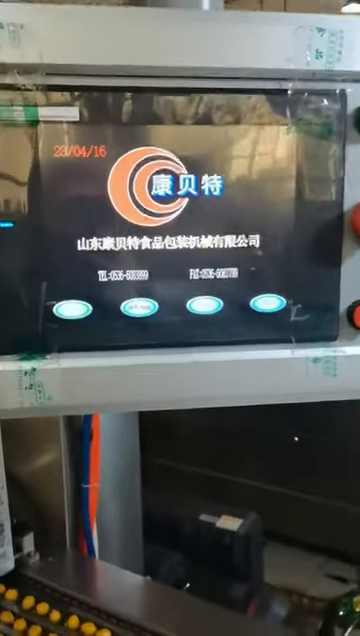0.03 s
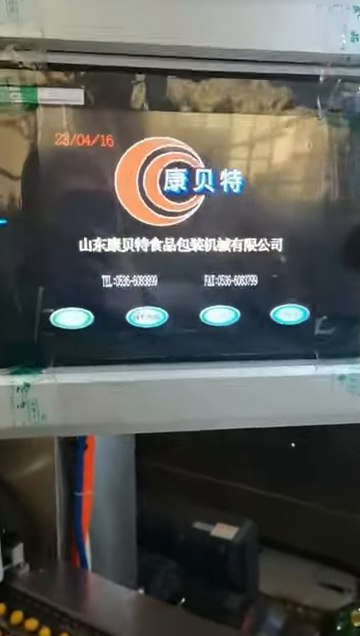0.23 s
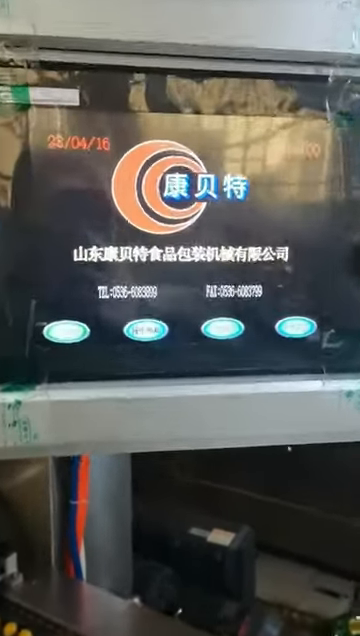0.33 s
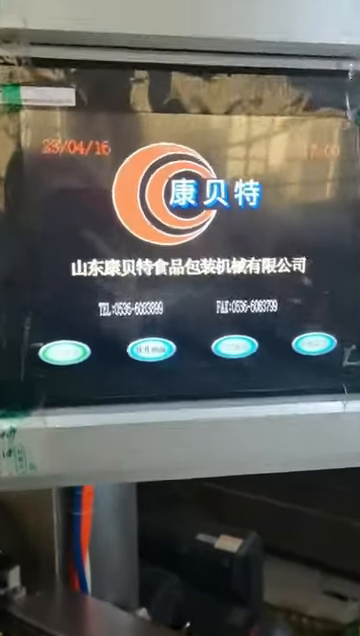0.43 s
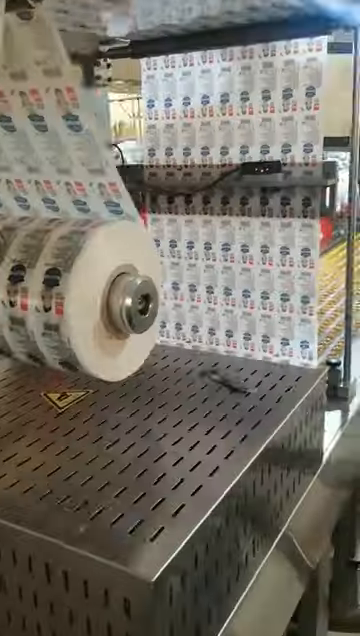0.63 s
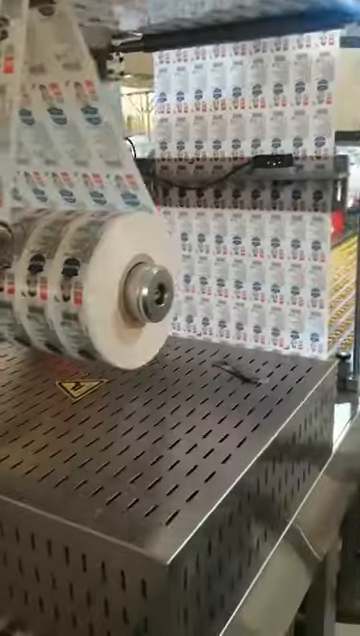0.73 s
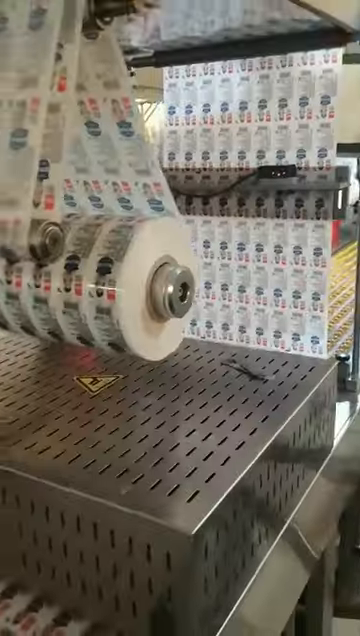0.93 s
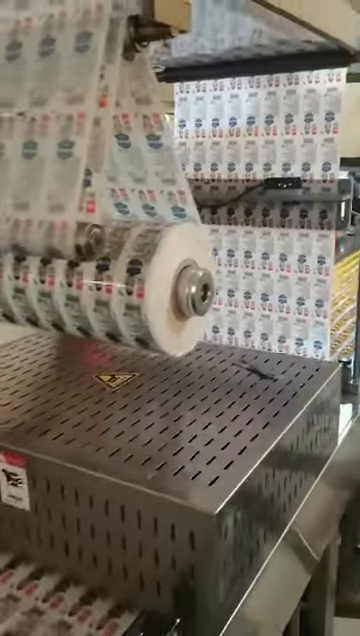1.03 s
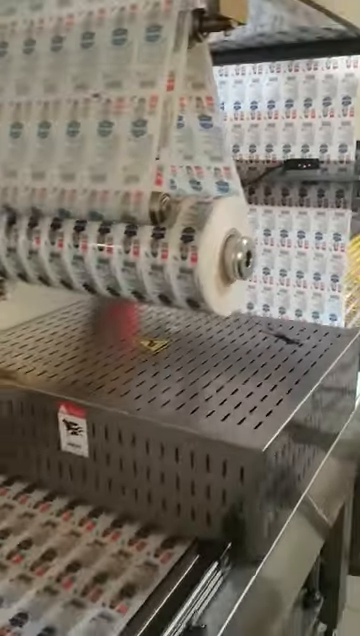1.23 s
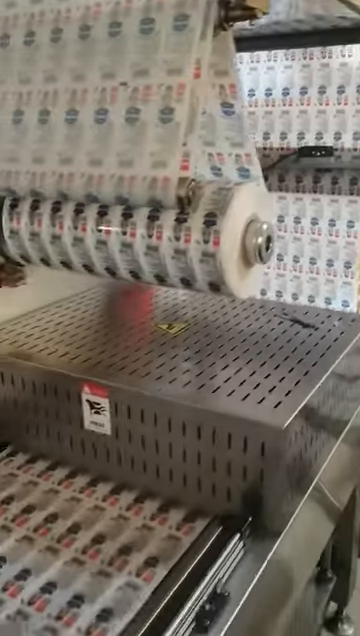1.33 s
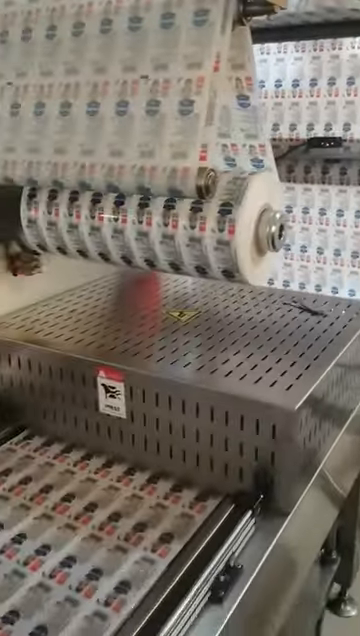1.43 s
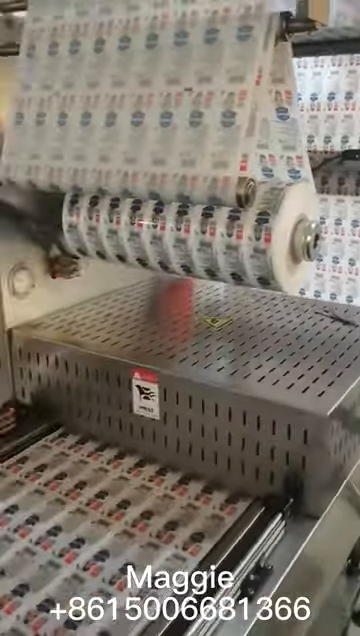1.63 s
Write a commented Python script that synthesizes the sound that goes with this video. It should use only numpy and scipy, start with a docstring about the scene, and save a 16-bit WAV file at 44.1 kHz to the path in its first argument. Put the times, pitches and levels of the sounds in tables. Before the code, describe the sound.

Air hisses in bursts from a nearby packaging machine over a low hum and whine. At 0.2 seconds a soft thump starts a sputtering blast, lasting until 0.5. Softer puffs and low knocks follow, with everything dipping briefly near 0.7. At 1.15 a smooth, bright hiss vents as the hum and whine drop. A small puff comes near 1.65. Each burst echoes in the factory hall.

```python
"""First comes the low hum and whine of a vacuum packaging machine, close by in a factory hall.
A faint hiss fades, then a valve thumps and lets out a sputtering blast. Softer air bleeds through
ringing pipes, and the whole sound dips once, briefly. A second valve vents a smooth, bright hiss
as the motor and pump drop away; a last small puff follows. Each burst of air bounces off steel
panels and rings on in the hall."""
import sys
import numpy as np
from scipy import signal
from scipy.fft import rfft, irfft
from scipy.io import wavfile

SR = 44100
rng = np.random.default_rng(int(sys.argv[2]) if len(sys.argv) > 2 else 0)


def to_wav(s):
    """Save 16-bit WAV."""
    ch = np.atleast_2d(s).T  # columns
    pcm = np.round(np.clip(ch, -1, 1) * 32767)  # PCM
    wavfile.write(sys.argv[1], SR, pcm.astype(np.int16))


N = 74970


def undb(db):
    """Turn decibels into a number to multiply by."""
    return 10 ** (np.asarray(db) / 20)

def clock():
    """The time of each sample in seconds."""
    return np.arange(N) / SR

def level_curve(points):
    """A volume that glides between (seconds, dB) points."""
    return undb(np.interp(clock(), *np.array(points).T))

def noise(gain):
    """Noise of average strength (rms) 1, with each frequency weighted by gain(Hz)."""
    freqs = np.arange(N // 2 + 1) * SR / N + 1e-6
    x = irfft(rfft(rng.standard_normal(N)) * gain(freqs), N)
    return x / x.std()

def coloured(points):
    """Noise shaped by (Hz, dB) points, fading out below the lowest one."""
    hz, db = np.array(points, float).T
    return noise(lambda f: undb(np.interp(np.log(f), np.log(hz), db)) * np.minimum(f / hz[0], 1) ** 2)

def resonant(hz, width):
    """Noise around one pitch: the narrower it is, the more it whistles."""
    return noise(lambda f: 1 / (1 + ((f - hz) / width) ** 2) ** 2)

def ringing(rings):
    """Air making metal ring at several pitches."""
    return sum(undb(db) * resonant(hz, width) for hz, width, db in rings)

def flutter(depth_db, rate_hz):
    """A smooth, random wobble in volume."""
    return undb(depth_db * noise(lambda f: np.exp(-(f / rate_hz) ** 2)))

def tone(hz, waver):
    """A machine tone, from steady (waver 0) to fully wavering (waver 1)."""
    steady = np.sqrt(2) * np.sin(2 * np.pi * (hz * clock() + rng.random()))
    return np.sqrt(1 - waver ** 2) * steady + waver * resonant(hz, width=22.7)

def swell(at, half_s):
    """A brief bell-shaped rise and fall."""
    return np.exp(-.5 * ((clock() - at) / half_s) ** 2)

def flow(start, rise, hold, db, sag, release):
    """A valve opens, holds and shuts. Sag and release are dB lost per second; a negative sag grows."""
    t = clock() - start - rise
    opening_db = 24.5 * np.minimum(t / rise, 0)
    return undb(db + opening_db - sag * np.clip(t, 0, hold) - release * np.maximum(t - hold, 0))


# The motor's tones. Each row: pitch in Hz, level in dB, waver from 0 to 1.
MOTOR_TONES = [(135.6, -51, 0.98), (160.8, -50, 0.65), (215.57, -46.5, 0.6), (297.7, -50, 0.84),
               (376.2, -58.5, 0.6)]
# How the hum swells and sinks. Each row: time in seconds, dB added to the tones.
MOTOR_SWELLS = [(0, -0.5), (.2, 6), (.32, -1.5), (.55, 3.5), (.85, -2), (1.15, -7), (1.21, -25),
                (1.35, -13), (1.58, -5), (1.7, -3.5)]

def motor():
    """A low hum that sinks when the second valve vents, then builds again."""
    hum = sum(undb(db) * tone(hz, waver) for hz, db, waver in MOTOR_TONES)
    return level_curve(MOTOR_SWELLS) * hum


# The colour of the pump's rumble. Each row: frequency in Hz, relative strength in dB.
PUMP_COLOUR = [(25, -11.5), (60, -3), (140, 0), (250, -4), (380, -3.5), (520, -11), (1000, -11.5),
               (2500, -14), (3200, -18.5), (7400, -13.5), (8700, -53), (14000, -28)]
# How loud the pump whines. Each row: time in seconds, level in dB.
WHINE_LEVELS = [(0, -45), (.15, -46.5), (.27, -51), (.55, -48.5), (.8, -47), (1.11, -42), (1.165, -50),
                (1.2, -62.5), (1.7, -62)]

def pump(whine_hz=441.8, idle_at_s=1.175, fall_s=0.014, idle_db=-14):
    """A whine over a slowly easing rumble; both fall to idle as the second valve vents."""
    t = clock()
    idling = np.clip((t - idle_at_s) / fall_s, 0, 1)
    level = undb(-39 - 2.5 * t + idle_db * idling)
    rumble = level * coloured(PUMP_COLOUR) * flutter(depth_db=1.8, rate_hz=29)
    whine = tone(whine_hz, waver=0.36) + undb(-16.5) * tone(2 * whine_hz, waver=0.91)
    return rumble + level_curve(WHINE_LEVELS) * whine


# The colour of the hall's background. Each row: frequency in Hz, relative strength in dB.
HALL_COLOUR = [(25, -2.5), (70, -0.5), (150, -3.5), (230, -4), (400, -5), (600, -7), (1500, -7.5),
               (2800, -7.5), (3300, -8), (4200, -4.5), (5200, -13.5), (7500, -9.5), (8700, -30),
               (10000, -18), (14000, -24.5)]

def hall_background():
    """The quiet, steady rush of the factory hall."""
    return undb(-48) * coloured(HALL_COLOUR)


# The colour of air in the pipes. Each row: frequency in Hz, relative strength in dB.
PIPE_COLOUR = [(500, -16), (1500, -22), (2500, -7.5), (3100, -9), (4300, -5), (5300, -5.5), (6400, 0.5),
               (7900, -1), (8550, -18), (9250, -11.5), (9800, -0.5), (11200, -3), (14000, -5)]
# The pipes' rings. Each row: pitch in Hz, width in Hz, dB compared with the air.
PIPE_RINGS = [(2760, 130, -23), (4186, 120, -18.5), (4907, 57, -17), (5713, 120, -21), (6240, 44, -15),
              (7630, 110, -12.5)]

def pipe_hiss():
    """Fluttering air that makes the pipes ring."""
    return (coloured(PIPE_COLOUR) + ringing(PIPE_RINGS)) * flutter(depth_db=0.9, rate_hz=48)

def fading_hiss(fade_db_per_s=84):
    """A faint hiss from the pipes, dying away from the very start."""
    return undb(-43.5 - fade_db_per_s * clock()) * pipe_hiss()


# Knocks of the mechanism. Each row: peak time and rise in seconds, pitch in Hz, level in dB.
FRAME_KNOCKS = [(.18, 0.0235, 217, -31), (.235, 0.0069, 196, -34), (0.254, 0.046, 58, -37),
                (0.407, 0.022, 158.5, -32.5), (0.606, 0.0088, 143, -36.5), (.79, 0.011, 132.2, -35.5),
                (.865, 0.013, 145, -35.5), (1.148, 0.0057, 212.7, -38.5), (1.669, 0.01, 128, -45.5)]

def knocks(decay_s=0.02):
    """Soft blows, each a short, low boom of the machine's frame."""
    out = 0
    for at, rise, hz, db in FRAME_KNOCKS:
        t = clock() - at
        shape = np.clip(1 + t / rise, 0, 1) * np.exp(-np.maximum(t, 0) / decay_s)
        boom = np.sqrt(2) * np.sin(2 * np.pi * hz * t) + undb(-7) * resonant(hz, width=160)
        out = out + undb(db) * shape * boom
    return out


# The first valve's blast. Each row: start, rise and hold in seconds, level in dB,
# sag and release in dB per second.
BLAST_FLOW = [(0.227, 0.033, 0.17, -22, 5, 130)]
# The colour of its jet. Each row: frequency in Hz, relative strength in dB.
BLAST_COLOUR = [(300, -27), (800, -12), (1350, -9.5), (1950, -1), (2750, 1.5), (3200, -5.5), (4100, -3.5),
                (5200, -5), (6300, 2.5), (7400, 1), (8400, -6.5), (10000, -1), (11800, -7.5), (14000, -6.5)]
# Its whistling port. One row: pitch in Hz, width in Hz, dB compared with the jet.
PORT_WHISTLE = (7080, 690, -6)
# Strong spurts in the blast. Each row: time in seconds, level in dB.
BLAST_SPURTS = [(.238, -35), (0.266, -26), (.285, -21), (.325, -24), (.339, -25), (.363, -28), (.404, -25)]
# The rasp as the valve closes. One row, laid out like BLAST_FLOW.
CLOSING_FLOW = (.415, .04, .034, -27.5, 0, 420)

def blast():
    """A sputtering jet whose port whistles, most of all in the spurts, and rasps as it closes."""
    port_hz, port_width, port_db = PORT_WHISTLE
    jet = coloured(BLAST_COLOUR) * flutter(depth_db=0.87, rate_hz=140)
    whistle = resonant(port_hz, port_width)
    held = sum(flow(*row) for row in BLAST_FLOW) * (jet + undb(port_db) * whistle)
    spurts = sum(undb(db) * swell(at, half_s=0.0028) for at, db in BLAST_SPURTS)
    rasp = flow(*CLOSING_FLOW) * resonant(hz=6100, width=2800)
    return held + spurts * (whistle + undb(-8) * jet) + rasp


# The nozzle's hollows. Each row: frequency in Hz, width in Hz, change in dB.
NOZZLE_HOLLOWS = [(3210, 130, -1.5), (4660, 120, -5.5), (5110, 120, -7)]

def nozzle(jet):
    """The nozzle weakens a few narrow bands of the blast."""
    f = np.arange(N // 2 + 1) * SR / N
    change_db = sum(db * np.exp(-((f - hz) / width) ** 2) for hz, width, db in NOZZLE_HOLLOWS)
    return irfft(rfft(jet) * undb(change_db), N)


# Soft puffs of air. Each row is laid out like BLAST_FLOW.
BLEED_FLOWS = [(.47, 0.073, 0.06, -39.5, 16, 100), (.555, 0.054, 0.048, -32.5, -20, 123),
               (0.674, 0.017, 0.012, -32.5, 4.5, 191), (.757, 0.028, 0.025, -32, 0, 57.5),
               (1.65, 0.027, 0.028, -40, -5, 101)]
# Thin whistles. Each row: peak time and half length in seconds, pitch in Hz, level in dB.
BLEED_WHISTLES = [(0.607, .025, 10450, -38), (0.77, .018, 9100, -35), (0.73, 0.014, 4940, -36.5),
                  (0.76, .05, 9980, -40.5)]
# A small, steady leak. One row, laid out like BLAST_FLOW.
LEAK_FLOW = (.85, .1, .2, -47, 0, 100)

def bleeds():
    """Air bleeds through the pipes in puffs, with thin whistles and a lingering leak."""
    puffs = sum(flow(*row) for row in BLEED_FLOWS) * pipe_hiss()
    whistles = sum(undb(db) * swell(at, half_s) * resonant(hz, width=190)
                   for at, half_s, hz, db in BLEED_WHISTLES)
    leak = flow(*LEAK_FLOW) * resonant(hz=11200, width=4300)
    return puffs + whistles + leak


# The second valve's hiss. Each row is laid out like BLAST_FLOW.
VENT_FLOW = [(1.145, 0.029, 0.16, -21.5, 0, 151)]
# The colour of its jet. Each row: frequency in Hz, relative strength in dB.
VENT_COLOUR = [(600, -26), (1600, -21), (2600, -11), (3200, -8), (4100, -1), (5500, -2.5), (7000, 3.5),
               (8400, -4.5), (9700, 1), (11500, -3.5), (14000, -3.5)]
# The exhaust's rings. Each row: pitch in Hz, width in Hz, dB compared with the jet.
EXHAUST_RINGS = [(1730, 110, -36.5), (2240, 100, -27), (2638, 100, -22.5), (2916, 86, -26)]

def vent():
    """The exhaust cracks open into a smooth, bright hiss with a faint metal ring."""
    jet = (coloured(VENT_COLOUR) + ringing(EXHAUST_RINGS)) * flutter(depth_db=0.5, rate_hz=40)
    hiss = sum(flow(*row) for row in VENT_FLOW) * jet
    opening = sum(swell(start + rise, half_s=0.011) for start, rise, *_ in VENT_FLOW)
    crack = undb(-23) * opening * resonant(hz=10200, width=5000)
    return hiss + crack


# Echoes off steel panels. Each row: delay in seconds, dB compared with the direct sound.
PANEL_ECHOES = [(.0014, -34), (.0033, -16.5), (.0058, -12.5), (0.0111, -20)]

def panels(air):
    """Nearby steel sheets bounce the hiss back and make it sound hollow."""
    t = clock()
    return air + sum(undb(db) * np.interp(t - delay, t, air, left=0) for delay, db in PANEL_ECHOES)


# The hall's echo. Each row: lowest and highest frequency in Hz, seconds to fade by 60 dB,
# dB compared with the sound going in.
HALL_ECHO_BANDS = [(100, 3300, 1, -7.5), (3080, 8200, 0.74, -6.5), (8000, 16000, 0.19, -21)]

def hall_echo(air):
    """Countless echoes blur into a tail whose high notes die first."""
    t, tail = clock(), 0
    build_up = np.minimum(t / 0.0046, 1)
    for low, high, fade_s, db in HALL_ECHO_BANDS:
        band = noise(lambda f: (f > low) & (f < high)) * np.exp(-np.log(1000) * t / fade_s) * build_up
        band_share = (high - low) / (SR / 2)
        tail = tail + undb(db) * band * np.sqrt(band_share / np.sum(band ** 2))
    return signal.fftconvolve(air, tail)[:N]


# A brief dip of the whole sound. Each row: time in seconds, change in dB.
VOLUME_DIP = [(0.647, -1), (.668, -8.5), (.685, -19.5), (0.698, -1.5), (.705, 0.5)]

def scene():
    """Add up the machine and the hall; only the escaping air echoes."""
    machine = motor() + pump() + knocks()
    air = panels(fading_hiss() + nozzle(blast()) + bleeds() + vent())
    mix = (machine + hall_background() + air + hall_echo(air)) * level_curve(VOLUME_DIP)
    return np.array([mix, mix])

def record(dry):
    """One microphone with a hollow in the treble and a steep cut of the very highest sounds."""
    hollow_hz, hollow_width_hz, hollow_db, top_hz = 8945, 590, -8.5, 14050
    f = np.arange(N + 1) * SR / (2 * N)
    hollow = undb(hollow_db * np.exp(-((f - hollow_hz) / hollow_width_hz) ** 4))
    top_cut = 1 / np.sqrt(1 + (f / top_hz) ** 400)
    return irfft(rfft(dry, 2 * N) * hollow * top_cut)[:, :N]


dry = scene()
out = record(dry)
to_wav(out)
```